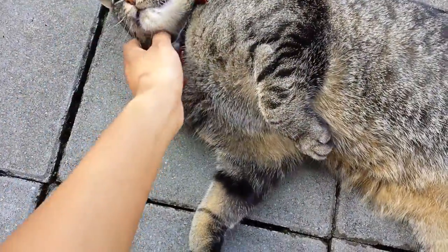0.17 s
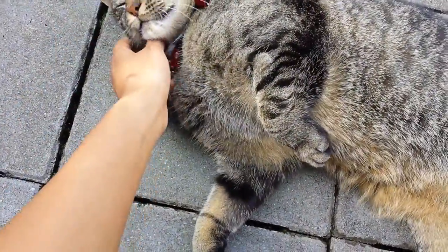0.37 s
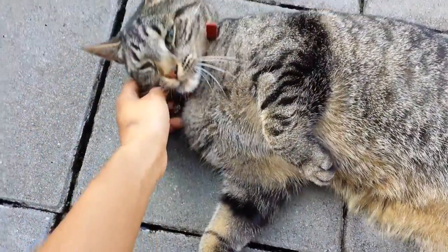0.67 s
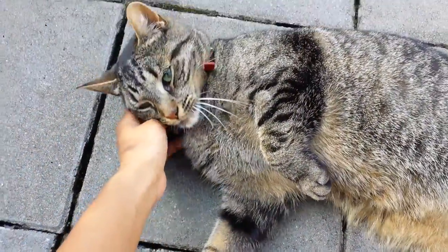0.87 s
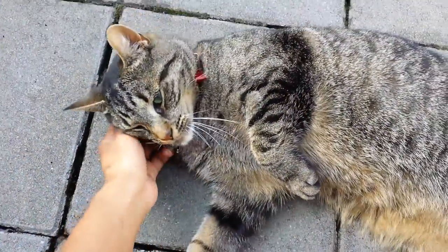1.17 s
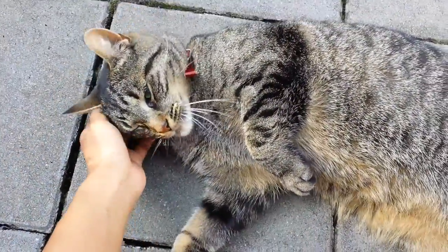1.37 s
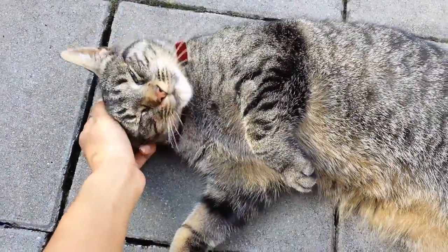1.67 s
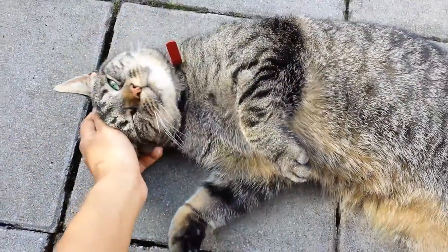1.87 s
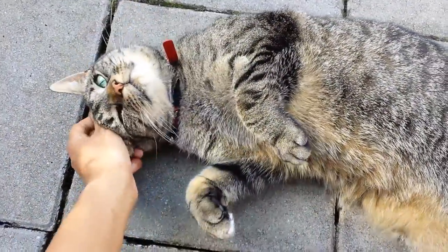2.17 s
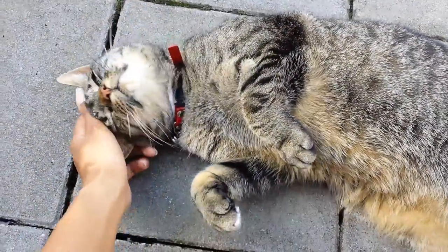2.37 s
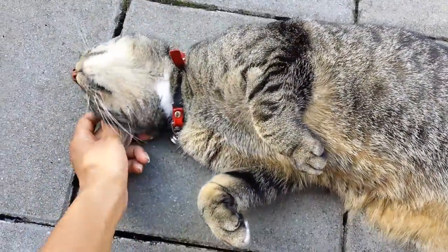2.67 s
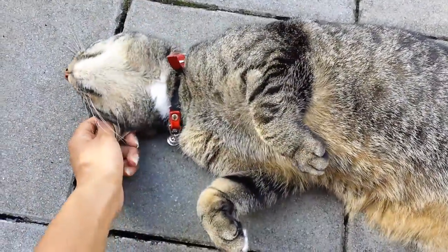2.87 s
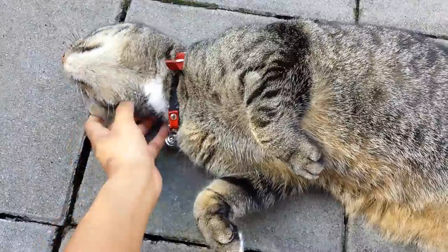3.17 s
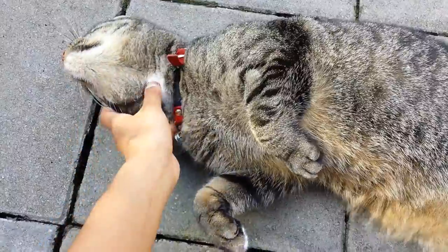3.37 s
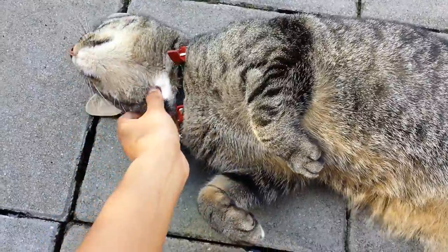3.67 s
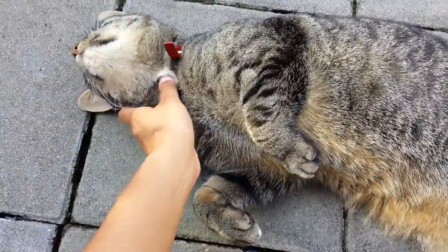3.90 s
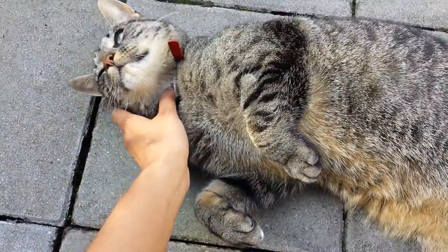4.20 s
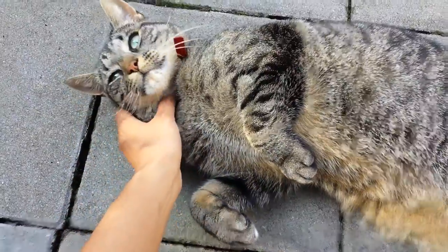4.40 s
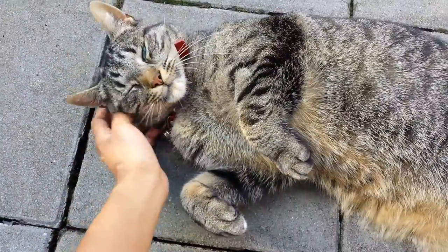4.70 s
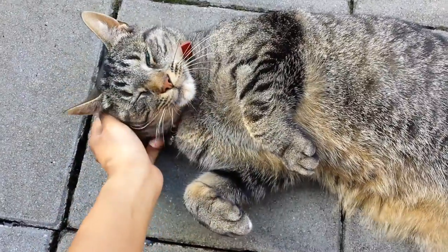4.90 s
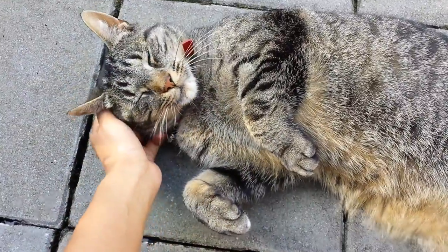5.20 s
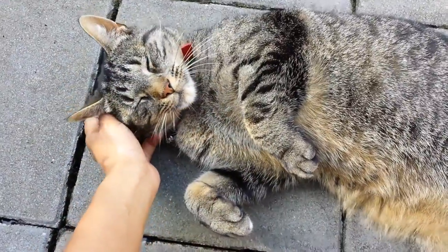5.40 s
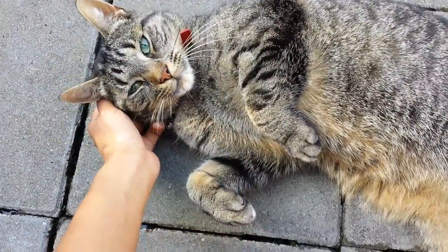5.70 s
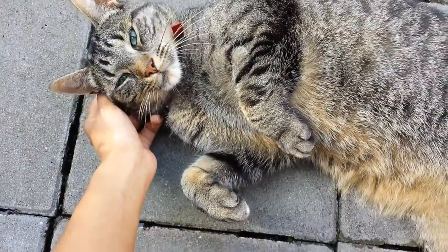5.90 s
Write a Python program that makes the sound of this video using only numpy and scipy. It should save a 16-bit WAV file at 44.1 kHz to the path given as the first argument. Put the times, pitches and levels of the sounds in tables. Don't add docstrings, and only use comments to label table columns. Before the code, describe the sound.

Fingers rub a cat's coat, barely rustling, while its collar tags and tiny bell give dry, bright, very short clinks. Busy at first, loudest just before 1.3 seconds with a strap scrape, then mostly sparse ticks with a brief return after three seconds. Far traffic rumbles low with a wavering engine note and a weak machine hum, heard close by an outdoor handheld microphone.

```python
import sys
import numpy as np
from scipy import signal
from scipy.fft import rfft, irfft, next_fast_len
from scipy.io import wavfile
from scipy.ndimage import uniform_filter1d, map_coordinates

SR = 44100
rng = np.random.default_rng(int(sys.argv[2]) if len(sys.argv) > 2 else 0)


def linear_from_db(decibels):
    return 10 ** (np.asarray(decibels, float) / 20)


def waveform_to_disk(signal):
    frames = np.transpose(np.atleast_2d(signal))
    scaled = np.clip(frames, -1, 1) * 32767
    samples = np.round(scaled).astype(np.int16)
    wavfile.write(sys.argv[1], SR, samples)


N = 266805

# (frequency [Hz], level [dB], t60 [s], left-right [dB], left lead [rad])
LOW_MODES = [(1470, -23, 0.072, 1.5, 4.6), (2140, -15, 0.059, -9, 4), (3688, -9, 0.097, -23, 2.5),
             (3921, -3, .07, -19, -9), (4454, -11, .06, -28.5, 4)]
MIDDLE_MODES = [(6080, -4, .04, -14, 9), (5960, -19, 0.096, -38, 3), (6274, -5.5, 0.022, -4, 1),
                (6070, -16, 0.18, -13, -1.5)]
HIGH_MODES = [(9040, -18, .06, 0.057, 0.46), (8920, -16.5, 0.06, 0.037, .4),
              (9230, -11.5, .08, 0.099, 0.58)]
FAMILIES = (LOW_MODES, MIDDLE_MODES, HIGH_MODES)


def unit(x):
    return x / np.sqrt(np.mean(x ** 2) + 1e-20)


def along(points, hz):
    f, v = np.transpose(points)
    return np.interp(np.log(hz + 1), np.log(f + 1), v)


def curves(rows, outside=None):
    s, *cols = np.transpose(rows)
    return np.array([np.interp(np.arange(N) / SR, s, c, outside, outside) for c in cols])


def wobble(rate_hz):
    knots = rng.standard_normal(int(N * rate_hz / SR) + 4)
    return map_coordinates(knots, [np.arange(N) * rate_hz / SR])


def oscillate(hz):
    return 2 * np.pi * np.cumsum(hz) / SR


def filtered(x, response):
    m = next_fast_len(N + SR // 2)
    return irfft(rfft(x, m) * response(np.fft.rfftfreq(m, 1 / SR)), m)[..., :N]


def sides(pan_db):
    return linear_from_db([np.minimum(pan_db, 0), np.minimum(-np.asarray(pan_db), 0)])


def rush(spectrum, alike, pan, patchy_db):
    z = signal.stft(rng.standard_normal((2, N)), nperseg=512)[2]
    field = uniform_filter1d(rng.standard_normal(z.shape[1:]), 8, 0)
    field = uniform_filter1d(field, 12, 1)
    pair = signal.istft(z * linear_from_db(patchy_db * unit(field)), nperseg=512)[1][:, :N]

    def mid_side(hz):
        turn = np.arccos(np.clip(along(alike, hz), -1, 1)) / 2
        return linear_from_db(along(spectrum, hz)) * [np.cos(turn), np.sin(turn)]

    mid, side = filtered(pair, mid_side)
    ports = np.array([mid + side, mid - side])
    return unit(filtered(ports, lambda hz: sides(along(pan, hz))))


def struck(hz, db, t60, pan_db, lead, t, attack_s):
    swing = np.exp(np.outer(2j * np.pi * hz - np.log(1000) / t60, t))
    start = linear_from_db(db) * np.exp(1j * rng.uniform(0, 2 * np.pi, len(hz)))
    ports = sides(pan_db) * start * [np.exp(1j * lead), np.ones(len(hz))]
    return (ports @ swing).imag * (1 - np.exp(-(t / attack_s) ** 2))


def traffic():
    # (frequency [Hz], density [dB per Hz])
    spectrum = [(8.8, -34), (15, -6), (38, 5), (93, -3.5), (145, -6.5), (209, -10), (300, -14.5),
                (451, -18.5), (707, -28), (914, -26.5), (1700, -35), (2500, -51.5), (3250, -71.5),
                (5500, -120)]
    # (frequency [Hz], left-right likeness)
    alike = [(60, 0.95), (130, 0.93), (290, .85), (640, .55), (1400, -0.29)]
    # (frequency [Hz], left-right [dB])
    pan = [(100, 1.3), (400, -0.46), (1300, -1)]
    level_db = -47.5 + 0.74 * wobble(2.956)
    return linear_from_db(level_db) * rush(spectrum, alike, pan, patchy_db=0.83)


def engine():
    # (time [s], frequency [Hz], level [dB])
    order = [(0.0, 84.39, -46), (0.4, 83.6, -44), (0.5, 85, -50.5), (0.86, 85, -55), (0.96, 89.4, -51),
             (1.18, 90.5, -43), (1.31, 94, -45.5), (1.82, 93.1, -43.5), (1.87, 96.53, -53),
             (2.37, 96.2, -45), (2.46, 98.4, -51), (3.96, 94.6, -42.5), (4.21, 95.1, -37.5),
             (4.52, 94.9, -51), (4.77, 92.3, -35.5), (4.9, 90, -36), (5.68, 89.6, -52), (6.05, 87.1, -40.5)]
    hz, db = curves(order)
    phase = oscillate(hz + 2.5 * wobble(14))
    tone = linear_from_db(db + 2 + 2.2 * wobble(16)) * np.array([np.sin(phase - .1), np.sin(phase)])
    octave = linear_from_db(-60 + 3 * wobble(5)) * np.sin(oscillate(188 + 3 * wobble(9)))
    return tone + octave


def hum():
    # (time [s], level [dB])
    fade = [(0, -49.5), (.15, -45), (.7, -46.5), (1.2, -53), (1.8, -60.5), (2.5, -56.5), (3.0, -53),
            (3.6, -70), (4.6, -58.5), (6.05, -67)]
    level_db = curves(fade)[0] + 1.5 * wobble(11)
    tone = linear_from_db(level_db) * np.sin(oscillate(243 + 1.2 * wobble(8.4)))
    return tone * sides(-2.1)[:, None]


def fur():
    # (time [s], level [dB])
    stroke = [(0.0, -69.5), (0.49, -69.5), (0.77, -70), (1.11, -64.5), (1.28, -66.5), (1.55, -68.5),
              (2.51, -67.5), (2.8, -69.5), (3.47, -67.5), (3.96, -69), (4.41, -65), (4.94, -67),
              (5.34, -63.5), (5.56, -64), (5.85, -66.5), (6.05, -69.5)]
    # (frequency [Hz], density [dB per Hz])
    spectrum = [(1200, -24), (2200, -8.5), (3300, -9.5), (4400, -3), (5500, -6.5), (6800, -11),
                (8000, -21.5), (10000, -33)]
    grain_db = 1.3 * wobble(5) + 1.3 * wobble(70)
    level_db = curves(stroke)[0] + 2 + grain_db
    return linear_from_db(level_db) * rush(spectrum, [(4000, -.05)], [(4000, -12.5)], patchy_db=1.26)


def hiss():
    # (frequency [Hz], density [dB per Hz])
    spectrum = [(500, -19), (1200, -3), (3000, 3), (6000, -3.5), (9000, -2), (12000, -5.5), (15000, -7)]
    # (frequency [Hz], left-right [dB])
    pan = [(2000, -2), (4500, -9), (8000, 7), (15000, 2.5)]
    return linear_from_db(-65) * rush(spectrum, [(4000, -0.034)], pan, patchy_db=1.4)


def roll():
    # (start [s], end [s], low [dB], middle [dB], high [dB])
    shakes = [
        (.02, .15, -69, -78, -81),
        (.315, .485, -68.5, -75, -81),
        (.54, .61, -83, -75, -79.5),
        (.69, .78, -77, -73, -76),
        (1.14, 1.25, -83, -79, -73),
        (1.28, 1.45, -86, -80, -82),
        (3.33, 3.42, -77, -83, -85),
        (3.55, 3.6, -74, -80, -80),
        (3.8, 3.87, -84, -80.5, -84),
    ]
    level = sum(linear_from_db(curves([(start, *db), (end, *db)], -150)) for start, end, *db in shakes)
    ticks = (rng.random(N) < 700 / SR) * rng.standard_normal(N)
    ticks = ticks * linear_from_db(5 * wobble(60))
    t = np.arange(SR // 10) / SR
    out = np.zeros((2, N))
    for gain, modes, extra_db, turn_db in zip(level, FAMILIES, (5.5, 5.5, 2.5), (0, 0, 6)):
        hz, db, t60, pan_db, lead = np.transpose(modes)
        murmur = struck(hz, db, .6 * t60, pan_db + turn_db, lead, t, attack_s=.0005)
        push = signal.fftconvolve(ticks[None], murmur, axes=1)[:, :N]
        out += linear_from_db(extra_db) * gain * unit(push)
    return out


def contacts():
    # (time [s], low [dB], middle
    # [dB], high [dB])
    taps = [(.0285, -48, -58, -73), (.0545, -42, -40, -37.5), (.1203, -47.5, -45, -51),
            (.2022, -51, -39, -37), (.3728, -37, -27.5, -33.5), (.4271, -35, -42, -45),
            (.5371, -49, -56, -61), (.996, -52, -52, -65), (1.1656, -47, -33.5, -27),
            (1.183, -52, -39, -55), (1.2157, -51, -43, -45), (1.2787, -44, -15, -23),
            (1.286, -15, -11, -6.5), (1.388, -45, -39, -41), (2.9748, -52, -51, -51.5),
            (3.0498, -50, -51.5, -74.5), (3.2833, -46, -40.5, -43), (3.3648, -37.5, -37.5, -29.5),
            (3.3755, -45, -65, -60), (3.381, -43, -69, -58), (3.5558, -30.5, -45, -57),
            (4.0885, -39, -41, -43), (4.318, -51, -44.5, -38.5), (4.6331, -49, -47, -42),
            (4.9877, -53, -51, -49), (5.1409, -53, -69, -64), (5.3404, -45, -62, -70),
            (5.3588, -55, -35.5, -22), (5.7527, -58, -44.5, -37)]
    # (time [s], low [dB], middle [dB], high [dB])
    strikes = [(.109, -46, -45, -55), (.5548, -63, -40, -33), (.6907, -25.5, -31.5, -54),
               (.7387, -51, -31.5, -32.5), (1.14, -48, -36, -31), (1.2992, -34, -22, -17),
               (1.3752, -37.5, -36, -25.5), (2.2182, -37, -41, -35), (3.5477, -31, -34.5, -45.5),
               (3.8117, -49, -40.5, -31.5), (4.5888, -30, -35.5, -41.5)]
    # (time [s], middle [dB], high [dB])
    edge_ticks = [(.3051, -50, -56), (.3777, -37, -32), (.3923, -52, -39), (1.151, -47, -33.5),
                  (1.2376, -50, -49), (1.6036, -48.5, -43), (1.823, -45, -41.5), (1.8688, -45, -53),
                  (2.228, -44.5, -39.5), (3.2425, -27, -30), (3.3268, -47, -34), (3.4044, -51, -39.5),
                  (3.651, -69, -51), (3.7074, -39, -39), (3.9625, -51, -49), (4.1652, -40.5, -46),
                  (4.3461, -46, -39), (4.4651, -50, -55), (4.4425, -53, -52), (4.5976, -46, -42),
                  (4.8764, -48, -38), (5.1074, -39, -32), (5.161, -52, -50), (5.235, -39.5, -27.5),
                  (5.374, -52, -51), (5.385, -62, -51), (5.983, -52, -40)]
    # (start [s], length [s], low [dB], middle [dB], high [dB])
    rattles = [
        (.3269, .035, -43, -47, -60),
        (.3864, .025, -52, -46, -48),
        (.4122, .065, -45, -53, -59),
        (1.3216, .047, -55, -45, -48),
        (1.394, .04, -64, -52, -60),
    ]
    bounce_s, bounce_scatter_s = .0088, .0012
    first_loss_db, next_loss_db = np.array([11, 18, 15]), 4
    gap_s, scatter_s, scatter_db = .007, .0018, 2.5

    rows = taps + strikes
    for s, middle, high in edge_ticks:
        rows.append((s, max(middle, high) - 22, middle, high))
    for s, *levels in strikes:
        for k in range(3):
            bounce = s + (k + 1) * bounce_s + bounce_scatter_s * rng.standard_normal()
            rows.append((bounce, *(np.array(levels) - first_loss_db - next_loss_db * k)))
    for s, length, *levels in rattles:
        for t in np.arange(0, length, gap_s):
            draw = rng.standard_normal(4)
            rows.append((s + t + scatter_s * draw[0], *(np.array(levels) + scatter_db * draw[1:])))
    return rows


def tag_ring(family, levels, free, turn_db, t):
    db = levels[family]
    hz, level, t60, pan_db, lead = np.transpose(FAMILIES[family])
    hz = hz * (1 + 0.0035 * rng.standard_normal(len(hz)))
    level = level - max(db + 28, 0) * (hz < 1800)
    level = level + rng.normal(0, 3.5, len(hz))
    glance_db = np.clip(1.3 * (db - levels[2]), -14, 0) * (family == 1)
    x = struck(hz, level, t60 * free, pan_db + turn_db, lead, t, attack_s=0.00071)
    return free * linear_from_db(glance_db) * x * np.exp(-(t / (0.053 * free)) ** 3)


def contact_crack(family, db, turn_db, t):
    # (centre [Hz], scatter [Hz], level [dB], t60 [s], left-right [dB])
    cracks = [
        [(3880, 170, -8, .018, -20), (5100, 500, -19, .007, -17), (3000, 350, -15, .009, -18)],
        [(6150, 240, -6, .012, -16), (7000, 350, -11, .008, -8)],
        [(8400, 500, -6, .007, 2), (7200, 400, -12, .006, -12), (5300, 600, -20, .006, -21),
         (3200, 700, -27, .006, -22), (9140, 120, 1.5, .014, 0), (10500, 400, -18, .007, -3),
         (11800, 700, -21, .009, -2), (14000, 900, -29, .009, -2)],
    ]
    centre, scatter, level, t60, pan_db = np.repeat(cracks[family], 3, axis=0).T
    level = level - .27 * (db + 32) * (centre > 10000)
    draw = rng.standard_normal((3, len(centre)))
    hz, lead = centre + scatter * draw[0], .4 + 0.34 * draw[2]
    return struck(hz, level + 1.7 * draw[1], t60, pan_db + turn_db, lead, t, attack_s=.00035)


def clinks():
    # (time [s], freedom to ring at -40 dB)
    loose = [(0, .8), (1.4, .78), (1.6, .6), (3.2, .75), (3.85, .75), (4.05, .55), (6.05, .55)]
    # (time [s], high family left-right [dB])
    facing = [(0, 3), (.2, 10), (.42, 8), (.56, 0), (.74, 0), (1.14, 11), (1.28, 3), (1.31, 9), (2, 8),
              (3.2, 13), (4.6, 14), (6.05, 11)]
    choke_per_db = .014
    t, crack_n = np.arange(SR // 11) / SR, SR // 40
    out = np.zeros((2, N + SR))
    for s, *levels in contacts():
        free = np.interp(s, *np.transpose(loose)) - choke_per_db * (max(levels) + 40)
        free = np.clip(free, .42, 1)
        swing_db = np.interp(s, *np.transpose(facing)) + 2.5 * rng.standard_normal()
        for family, db in enumerate(levels):
            turn_db = swing_db * (family == 2)
            x = tag_ring(family, levels, free, turn_db, t)
            x[:, :crack_n] += contact_crack(family, db, turn_db, t[:crack_n])
            out[:, round(s * SR):][:, :len(t)] += linear_from_db(db) * x / np.abs(x).max()
    return out[:, :N]


def strap():
    # (start [s], rise [s], fall [s], peak [dB])
    drags = [
        (.3, .07, .13, -57),
        (.85, .04, .14, -67),
        (1.275, .008, .15, -52),
        (3.49, .04, .14, -60),
    ]
    # (frequency [Hz], density [dB per Hz])
    spectrum = [(2500, -30), (4000, -9.5), (6500, -3.5), (7800, -1), (9500, -7.5), (11500, -12),
                (14000, -21.5)]
    rise_db, fall_db = 20, 24
    level = np.zeros(N)
    for s, rise, fall, db in drags:
        peak = s + rise
        pull = [(s, db - rise_db), (peak, db), (peak + .6 * fall, db - .3 * fall_db), (peak + fall, db - fall_db)]
        level += linear_from_db(curves(pull, -150)[0])
    pan = [(4000, -12), (6500, -6), (8000, 3)]
    return level * linear_from_db(1.9 * wobble(220)) * rush(spectrum, [(4000, .3)], pan, patchy_db=2.5)


def touches():
    # (time [s], peak [dB], frequency [Hz], left-right [dB])
    pats = [
        (2.42, -34.5, 420, -22),
        (2.4205, -41, 2223, -8),
        (5.704, -34.5, 600, -22),
        (1.286, -38, 1100, -3),
        (5.76, -45, 900, -3),
    ]
    out, t = np.zeros((2, N + SR)), np.arange(SR // 30) / SR
    for s, db, hz, pan_db in pats:
        pat = linear_from_db(db - 60 * t / (5 / hz)) * np.sin(2 * np.pi * hz * t)
        out[:, round(s * SR):][:, :len(t)] += sides(pan_db)[:, None] * pat
    return out[:, :N]


def whine():
    fade_db = curves([(3.05, -105), (3.15, -80), (3.55, -81), (3.7, -105)], -150)[0]
    tone = linear_from_db(fade_db + 3 * wobble(18)) * np.sin(oscillate(14050 + 40 * wobble(30)))
    return tone * sides(5.4)[:, None]


def scene():
    surroundings = traffic() + engine() + hum() + hiss() + whine()
    hand = fur() + touches()
    collar = roll() + clinks() + strap()
    return surroundings + hand + collar


def low_pass(x):
    return signal.sosfilt(signal.butter(12, 16360, fs=SR, output="sos"), x)


def record(dry):
    mix = filtered(dry, lambda hz: hz < 15620)
    return low_pass(mix)


dry = scene()
out = record(dry)
waveform_to_disk(out)
```